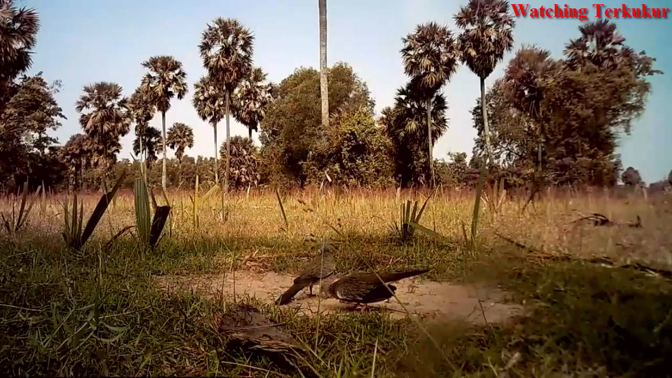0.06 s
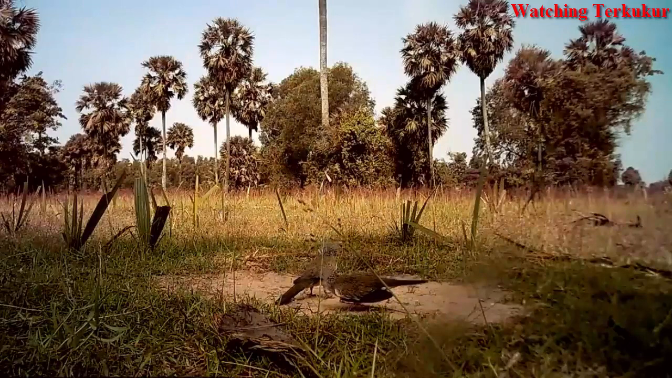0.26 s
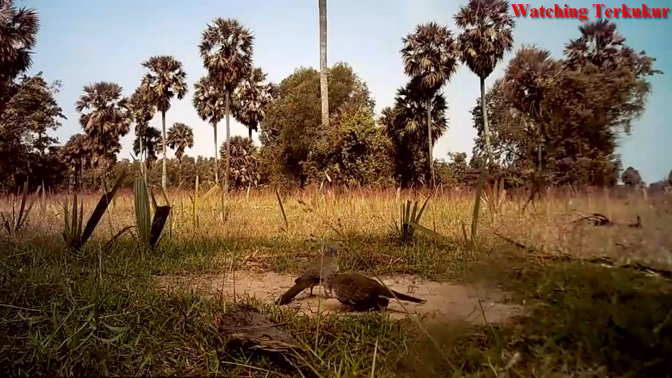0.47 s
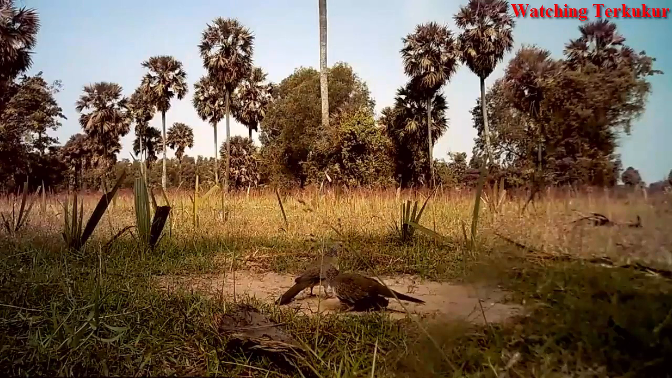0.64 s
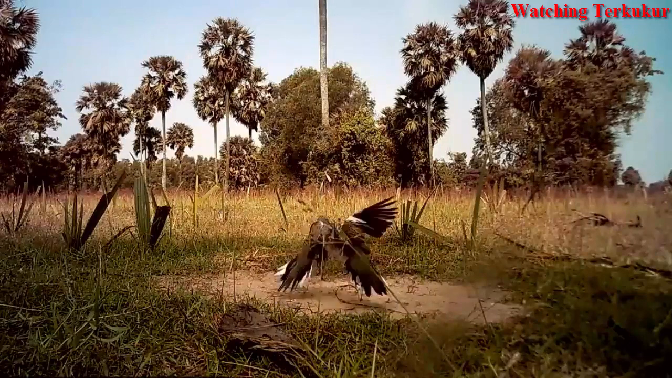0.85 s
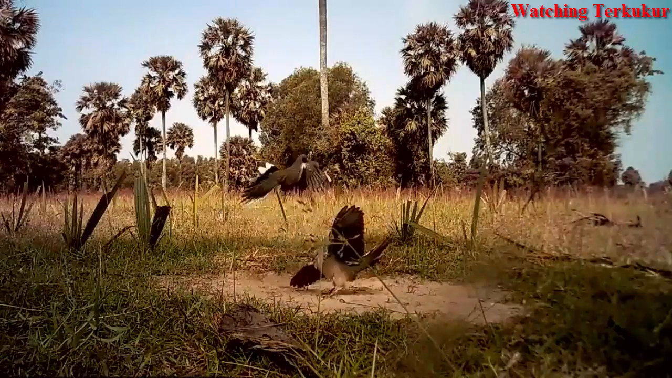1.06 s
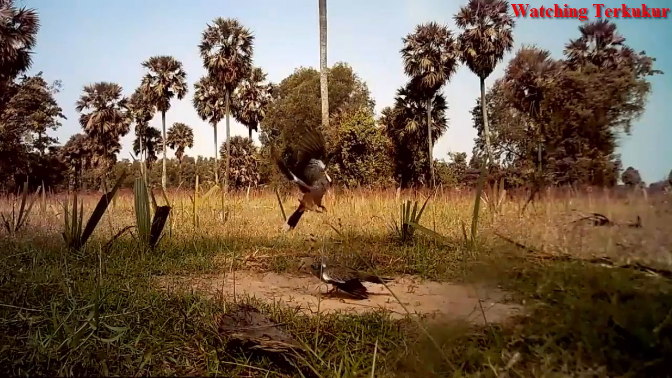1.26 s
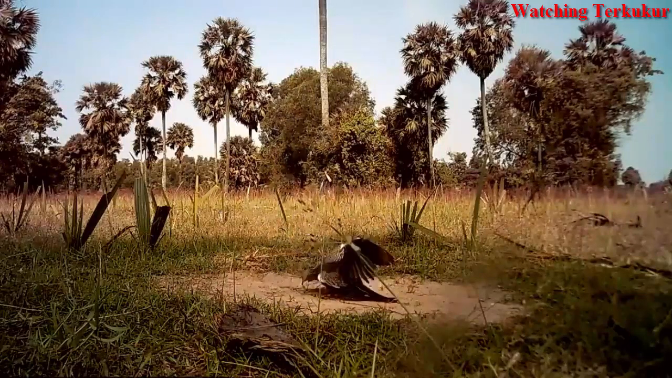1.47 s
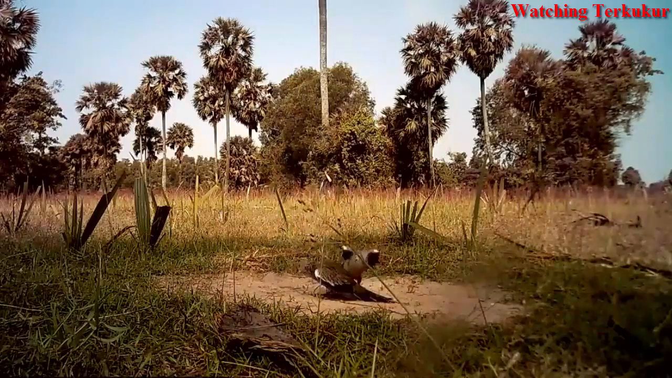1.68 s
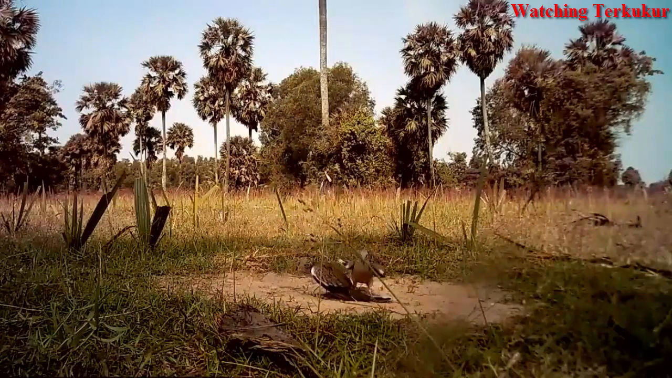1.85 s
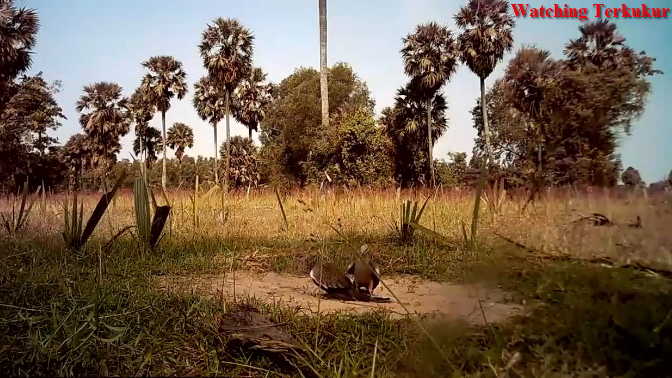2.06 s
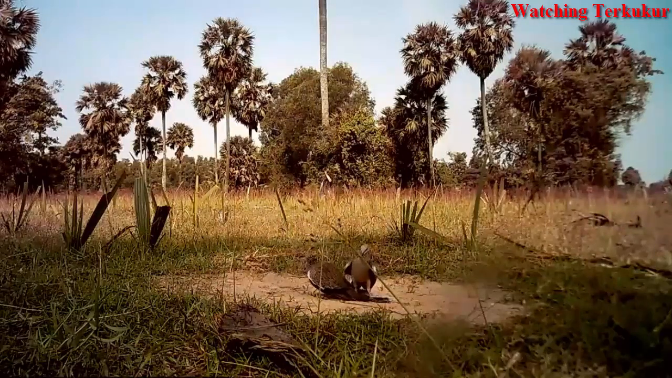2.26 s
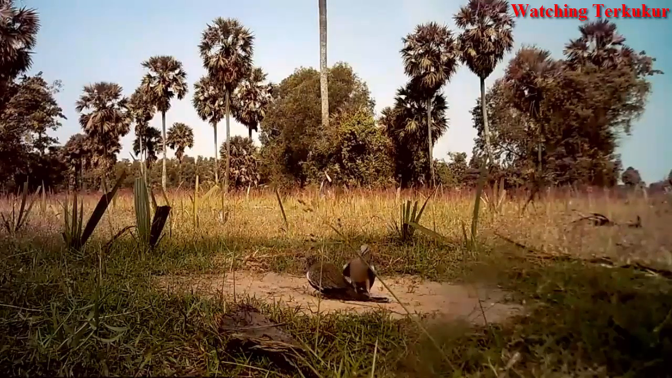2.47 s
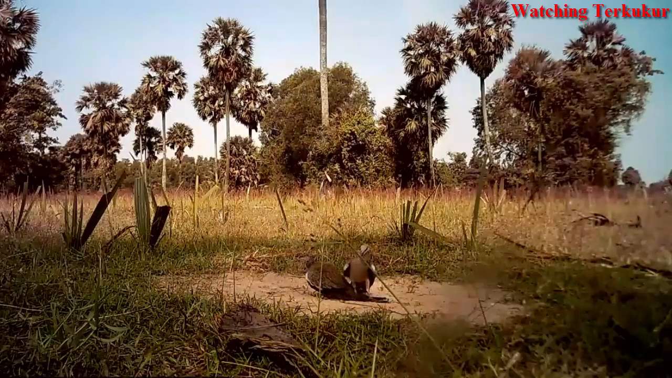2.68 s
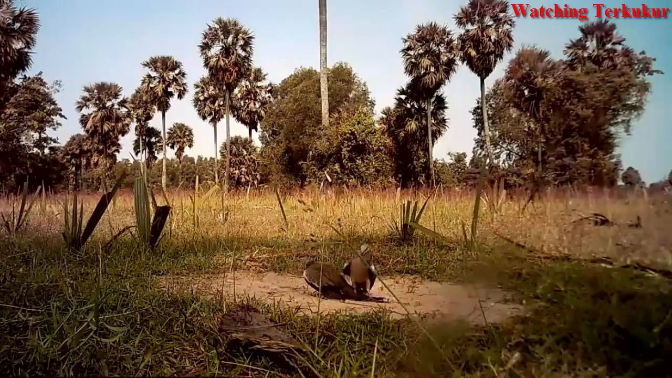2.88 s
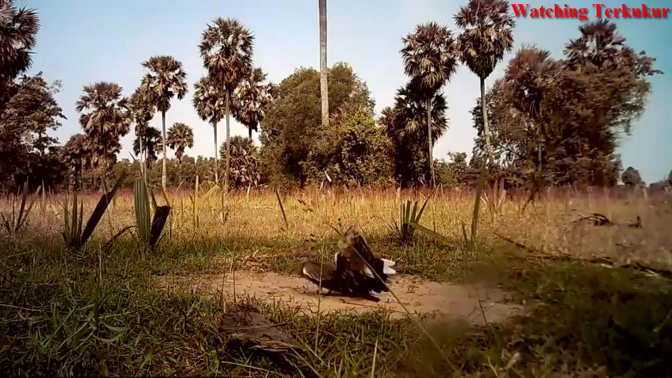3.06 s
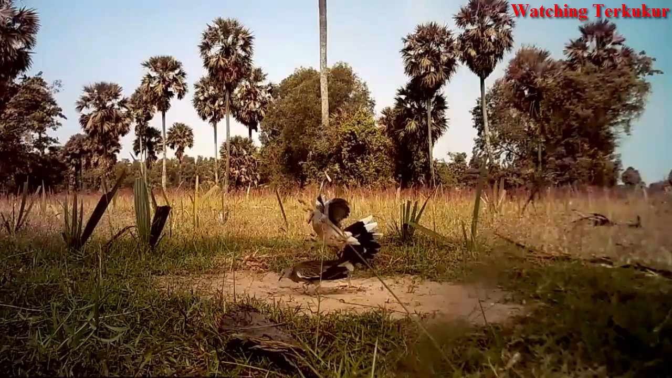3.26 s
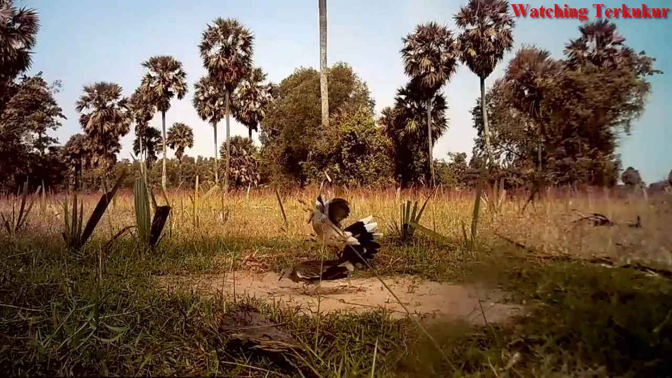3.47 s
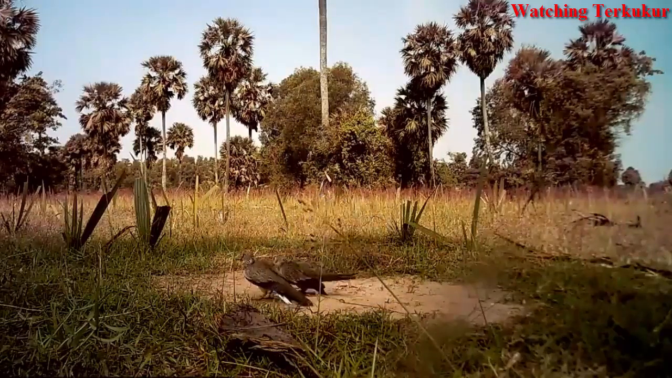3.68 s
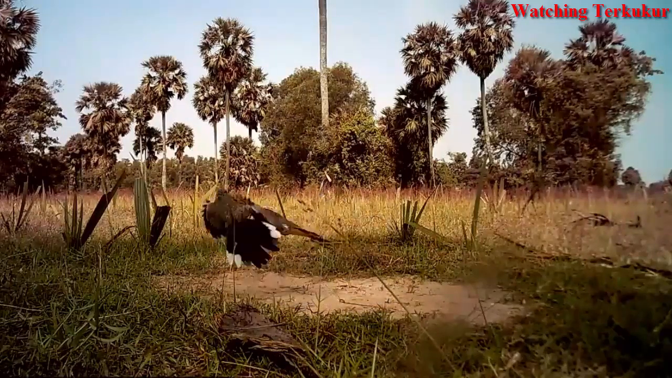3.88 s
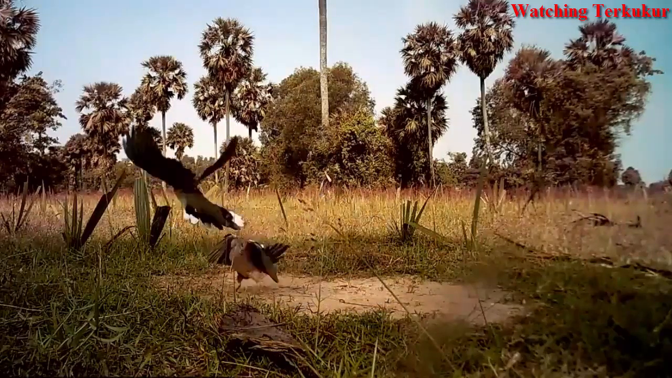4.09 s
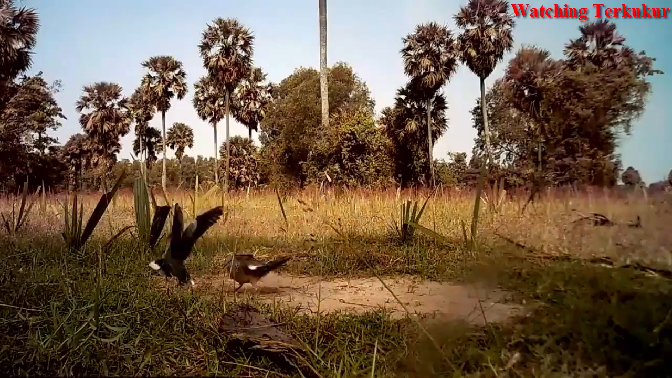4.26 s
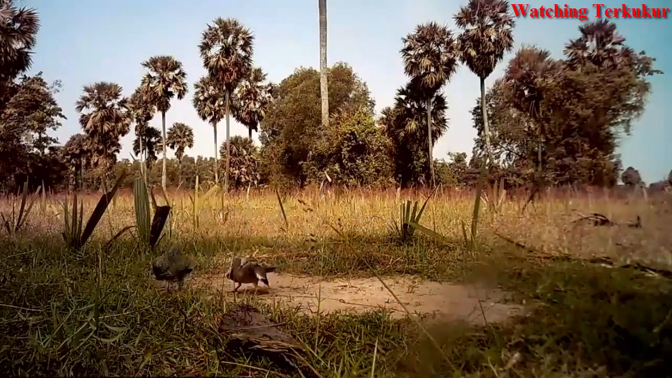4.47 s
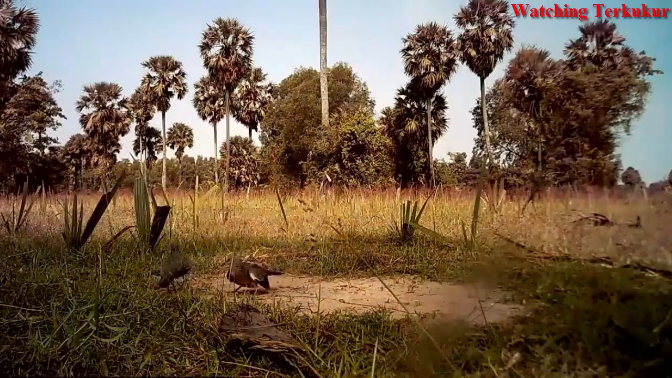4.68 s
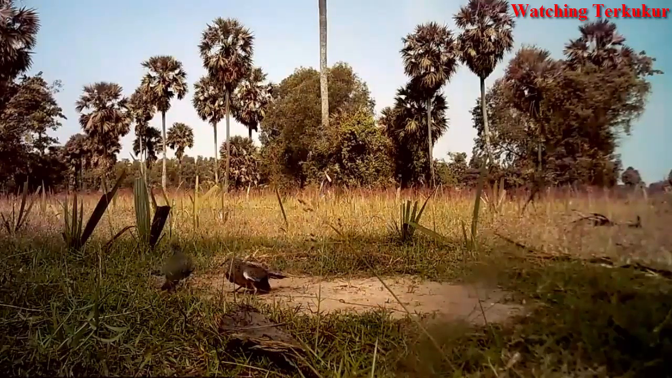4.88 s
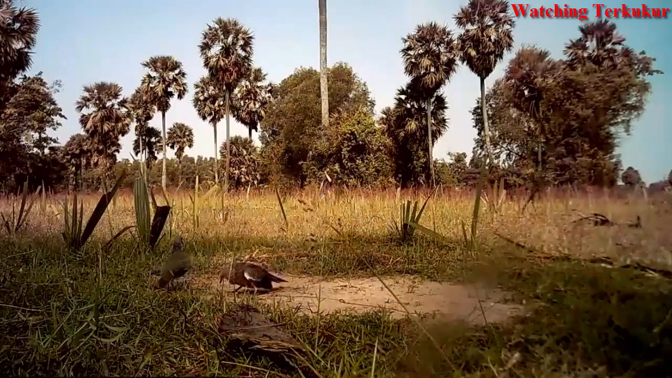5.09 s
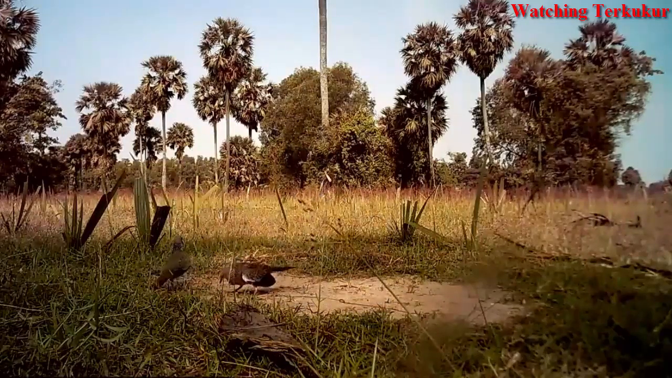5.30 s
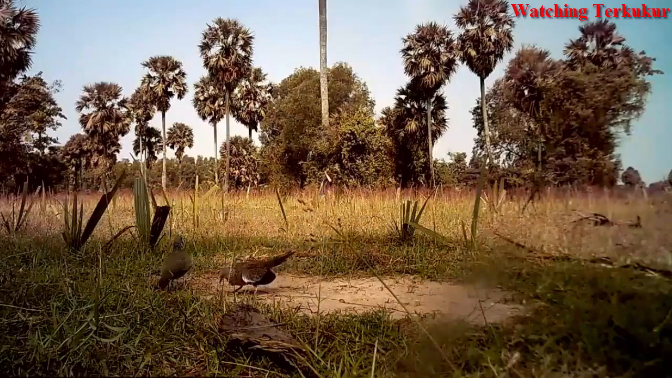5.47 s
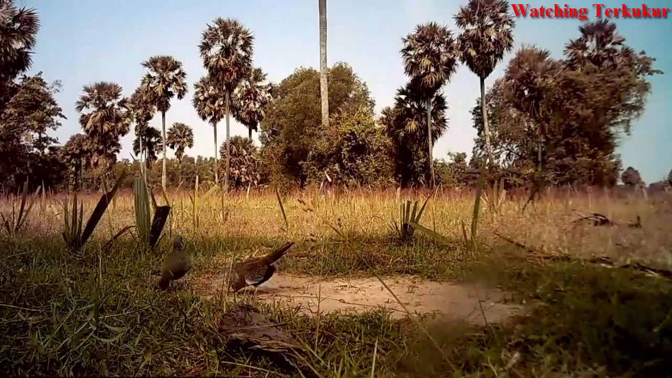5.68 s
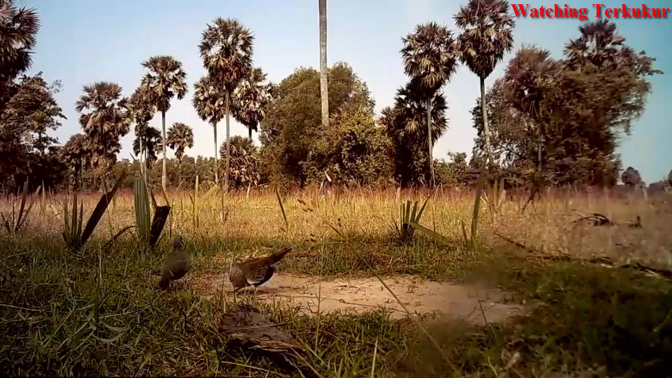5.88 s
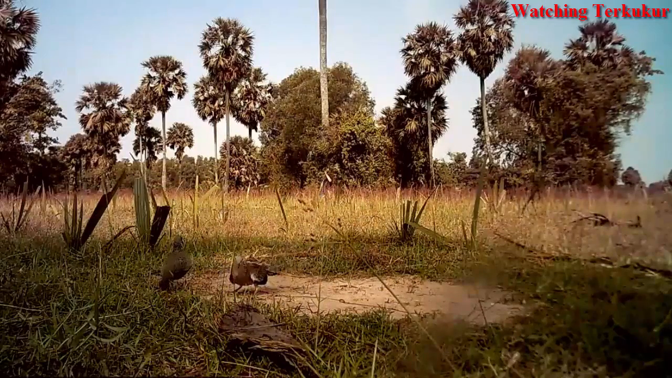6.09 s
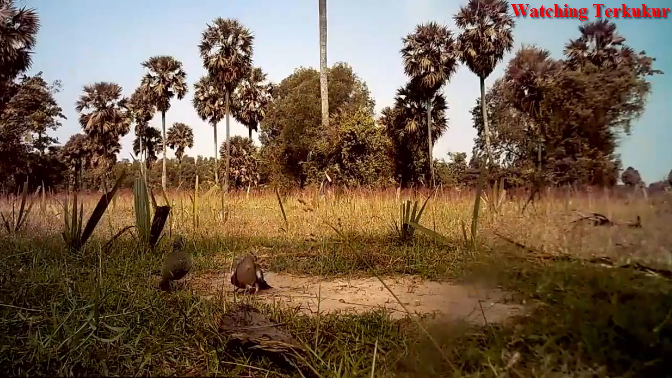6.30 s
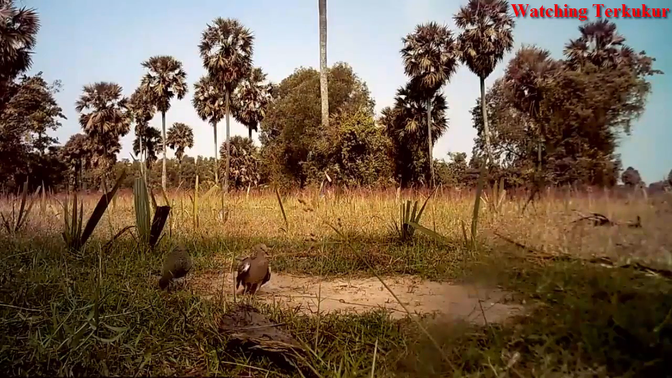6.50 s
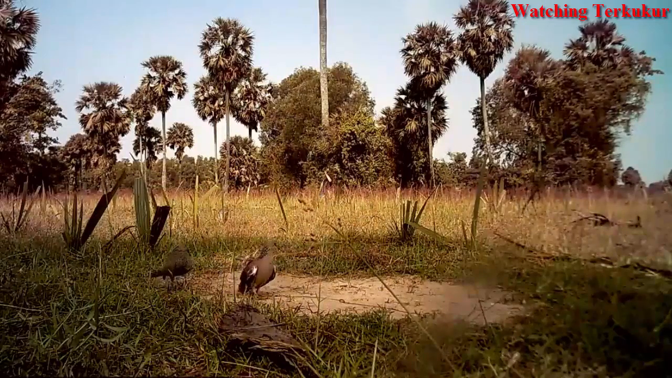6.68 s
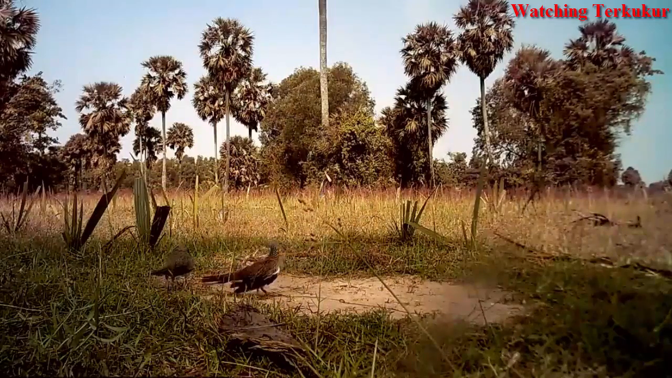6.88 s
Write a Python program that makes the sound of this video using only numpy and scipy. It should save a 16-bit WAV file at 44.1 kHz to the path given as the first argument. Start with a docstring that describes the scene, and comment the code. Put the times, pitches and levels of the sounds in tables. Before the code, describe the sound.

Two doves scuffle in an open field, wings clapping in sudden sharp bursts over low wind rumble, with faint whistled bird notes far off.

```python
"""Two doves scuffle on bare ground: wings clap in quick clusters and beat the air.
Each clap is a short, quickly fading pop of trapped air, unsteady in pitch, with feather crackle;
wing beats are fluttering bands of noise. Wind and far traffic rumble as low noise, with faint hiss above.
Soft whistled notes and a faint coo are gliding sines; far twitter is narrow noise bands.
A small camera's converter adds an offset and clips the loudest claps."""
import sys
import numpy as np
from scipy import signal
from scipy.fft import rfft, irfft
from scipy.io import wavfile
from scipy.ndimage import uniform_filter1d

SR = 44100
rng = np.random.default_rng(int(sys.argv[2]) if len(sys.argv) > 2 else 0)


def to_wav(s):
    """Save 16-bit WAV."""
    ch = np.atleast_2d(s).T  # columns
    pcm = np.round(np.clip(ch, -1, 1) * 32767)  # PCM
    wavfile.write(sys.argv[1], SR, pcm.astype(np.int16))


N = 306054


def undb(db):
    """Gain of a level in dB."""
    return 10 ** (np.asarray(db) / 20)


def curve(table, pad_s=0.023):
    """Join the points of a table with straight lines, one curve per column; silent outside its span."""
    s, *columns = np.transpose(table)
    s = np.r_[s[0] - pad_s, s, s[-1] + pad_s]
    return [np.interp(np.arange(N) / SR, s, np.r_[-120, column, -120]) for column in columns]


def colour(x, shape):
    """Make some pitches stronger than others, following (pitch [Hz], level [dB]) points."""
    hz, db = np.transpose(shape)
    f = np.arange(len(x) // 2 + 1) * SR / len(x) + 1
    gain = undb(np.interp(np.log(f), np.log(hz), db))
    return irfft(rfft(x) * gain, len(x))


def unit(x):
    """Scale to an average strength (rms) of 1."""
    return x / np.sqrt(np.mean(x ** 2))


def band(x, lo_hz, hi_hz, order=2):
    """Keep mainly the pitches between two edges."""
    return signal.sosfilt(signal.butter(order, [lo_hz, hi_hz], "band", fs=SR, output="sos"), x)


def walk(rate):
    """Wandering level: random steps, `rate` per second, smoothed twice."""
    k = int(SR / rate)
    steps = np.repeat(rng.standard_normal(N // k + 1), k)
    return 1.4 * uniform_filter1d(uniform_filter1d(steps, k), k)[:N]


def patch(hz, patchy_db, rate, width_hz=80):
    """A narrow noise band that comes and goes on its own."""
    noise = rng.standard_normal(N)
    return unit(band(noise, hz, hz + width_hz)) * undb(patchy_db * walk(rate))


# Tone of the open field: (pitch [Hz], level [dB])
FIELD_TONE = [(7.1, -29), (12, -20.5), (18, -10.5), (27, -10.5), (54, -8.5), (155, -15), (383, -27),
              (1170, -43), (1480, -63.5), (2550, -65.5), (2960, -69), (3660, -64.5), (5750, -75.5),
              (11800, -72.5), (16000, -95)]
# Loudness of the low rumble: (time [s], level [dB])
RUMBLE_CURVE = [(0, -36), (.37, -41), (.85, -46), (1.06, -40), (1.41, -40.5), (2.2, -40.5), (3.1, -40.5),
                (3.6, -39), (4.0, -37), (4.4, -39.5), (5.1, -39), (5.9, -41), (6.5, -45), (6.94, -47.5)]
# Fader on the steady noise, and on the offset in record(): (time [s], level [dB])
FADER_CURVE = [(0, 0), (.86, -6), (.885, 0), (5.95, -0.5), (6.94, -5.5)]


def field(gust_db=-0.79, flicker_db=2.0, drone_db=-13.0):
    """Wind and far traffic: low bands gust together and flicker alone, with steady noise above."""
    air = unit(colour(rng.standard_normal(N), FIELD_TONE))
    gust = walk(6.0)
    low = 0
    for hz in (7, 14, 28, 56, 112, 224):
        low = low + band(air, hz, 2 * hz, order=1) * undb(gust_db * gust + flicker_db * walk(20))
    # a hump in the low middle
    drone = unit(band(rng.standard_normal(N), 205, 290)) * undb(drone_db + 1.4 * walk(4.7))
    above = signal.sosfilt(signal.butter(2, 380, "high", fs=SR, output="sos"), air)
    steady = undb(-40.5) * above * undb(curve(FADER_CURVE)[0])
    return undb(curve(RUMBLE_CURVE)[0]) * (unit(low) + drone) + steady


def flaring_bands(x, edges_hz, patchy_db):
    """Split noise into neighbouring bands that each flare on their own."""
    total = 0
    for lo, hi in zip(edges_hz, edges_hz[1:]):
        total = total + band(x, lo, hi, order=3) * undb(patchy_db * walk(45))
    return unit(total)


# Tone of feathers, in beats and slaps alike: (pitch [Hz], level [dB])
FEATHER_TONE = [(35, -37.5), (60, -4.5), (316, -1.5), (803, -5), (938, -12), (1140, -9.5), (1860, -16.5),
                (2150, -24), (2400, -28.5), (2800, -27.5), (3300, -25.5), (3700, -32), (4140, -42.5),
                (7700, -47), (11000, -50.5), (15000, -52)]
# Effort of the wings, one list per flurry:
# (time [s], feather rustle [dB], its upper part [dB], hiss of the wing tips [dB])
WING_BEATS = [
    [(.878, -50, -50, -64), (.90, -31, -44, -50), (.945, -30, -42, -54), (.97, -32, -45, -54.5),
     (.99, -38, -44.5, -56), (1.012, -37.5, -46, -59.5), (1.025, -43, -51, -65), (1.042, -28, -43, -55),
     (1.072, -41, -51, -68), (1.095, -42, -47, -62), (1.115, -42.5, -65, -73), (1.132, -43, -63, -67),
     (1.15, -35, -48, -47.5), (1.164, -42, -53, -62), (1.175, -37, -53, -54), (1.19, -46, -74, -69),
     (1.25, -49, -72, -69), (1.30, -54.5, -81, -81), (1.35, -63, -78, -84), (1.41, -58.5, -72, -71),
     (1.46, -66, -80, -83), (1.55, -60, -74, -83), (1.58, -58.5, -63, -76), (1.605, -49.5, -54, -76),
     (1.635, -58, -66, -82), (1.75, -60, -73, -81)],
    [(3.168, -45, -62, -69), (3.19, -36.5, -51, -54), (3.22, -36.5, -42, -58), (3.236, -40, -51, -67),
     (3.262, -47, -53, -68), (3.28, -47, -63, -82), (3.305, -52, -69, -77), (3.35, -63, -73, -72),
     (3.39, -59, -80, -84), (3.43, -52, -58, -72), (3.47, -64, -73.5, -89), (3.6, -70, -78, -86.5)],
    [(3.797, -60, -70, -59.5), (3.815, -50.5, -58, -53), (3.83, -35.5, -40, -48), (3.88, -31.5, -37, -56),
     (3.905, -38, -47, -54), (3.925, -37.5, -47, -56), (3.945, -40.5, -51, -60), (3.98, -35, -45, -57.5),
     (4.015, -41.5, -51, -56.5), (4.035, -47, -68, -68), (4.06, -46, -71, -66), (4.105, -55, -75, -74),
     (4.16, -61.5, -76, -76.5), (4.3, -65, -72, -77)],
]
# whoosh level [dB] when the rustle is at -40 dB, and its rise per dB of rustle [dB]
WHOOSH_DB, WHOOSH_FOLLOWS = -34, 0.74


def beats(flutter_db=1.2, hiss_flutter_db=1.2, patchy_db=1.3):
    """Beating wings stir the air: whoosh, rustle and hiss share a flutter, and patches flare alone."""
    air = colour(rng.standard_normal(N), FEATHER_TONE)
    flutter = walk(90)
    grainy = air * undb(2.0 * walk(450))
    rough = grainy * undb(flutter_db * flutter)
    whoosh = unit(band(rough, 59, 200))
    rustle = flaring_bands(rough, (375, 600, 900, 1270), patchy_db)
    upper = flaring_bands(rough, (1270, 1551, 1800, 2120), patchy_db)
    hissing = grainy * undb(hiss_flutter_db * flutter)
    hiss = flaring_bands(hissing, (2450, 2940, 3230, 3700, 10900), patchy_db)
    # the strongest flurry counts at each moment
    db, upper_db, hiss_db = np.max([curve(flurry, pad_s=.012) for flurry in WING_BEATS], axis=0)
    whoosh_db = WHOOSH_DB + WHOOSH_FOLLOWS * (db + 40)
    return undb(whoosh_db) * whoosh + undb(db) * rustle + undb(upper_db) * upper + undb(hiss_db) * hiss


# Wing slaps and softer strokes: (time [s], peak of the pop [dB], pitch of the trapped air [Hz],
# brightness [dB per octave], drawn out [dB], ring of the feather shafts [dB])
WING_SLAPS = [(0.8857, -28, 530, 3.5, 1.5, 0), (0.8874, -10, 406, -1.5, -1, -25),
              (0.8917, -19, 753, 1, -6, -21), (0.907, -12, 880, 2.5, 2.5, -15),
              (0.9092, -12.5, 1720, 2.5, -5, -12), (0.911, -23, 1053, 4, 1, -9),
              (0.917, -22, 442, 1, -1.5, -17), (0.926, -18, 380, -0.5, -4, -25),
              (0.933, -7, 1410, 1.5, -3, -21), (0.935, -7.5, 463, 2, -3.5, -15),
              (0.9390, -13.5, 300, 0.5, 0.5, -29), (0.9503, -27, 586, 0.5, 6, -27),
              (0.98, -29.5, 336, 0.5, 1, -25), (1.033, -28.5, 1280, 1, 0, -27),
              (1.0395, -22, 492, -2, 0, -42), (1.0511, -25, 316, 0, -9, -35),
              (1.082, -45, 266, 2.5, 2, -23), (1.139, -28.5, 698, -1.5, 4, -8),
              (1.1483, -20.5, 694, -1.5, 3.5, -10), (1.172, -31, 503, 0.5, -4.5, -19),
              (1.198, -42, 790, -11, -1, -32), (1.2064, -22.5, 200, -10, 3, -42),
              (1.235, -28, 171, -10, 4, -40), (1.307, -47, 250, 1, 0, -14),
              (1.489, -35.5, 191, -9.5, 6, -43), (1.577, -46.5, 1600, -3, -4.5, -32),
              (1.597, -47, 900, 2.5, -3.5, -40), (1.61, -41, 860, 1, -7, -45),
              (3.169, -28, 196, -5.5, 1, -38), (3.177, -27, 282, -4.5, -3.5, -27.5),
              (3.1917, -19.5, 780, 4.5, 4, -2), (3.1937, -3, 330, 1, -4.5, -20),
              (3.1995, -9.5, 1020, 0.5, -1, -44), (3.203, -17, 702, -2, 7, -28),
              (3.211, -18.5, 606, 0.7, -1, -40), (3.249, -44.5, 1110, 3, 4, -28),
              (3.274, -42, 773, -6, 2.5, -35), (3.424, -46.5, 744, -2.5, 5, -38.5),
              (3.8195, -17.5, 320, -1, 1.5, -35), (3.8389, -2, 702, -0.5, -1.5, -17.5),
              (3.8404, 4, 358, 0.5, 1, -30), (3.8452, -8.5, 1070, 1, 0.5, -8),
              (3.8536, -8.5, 271, -1, 2.5, -33), (3.861, -2, 596, -1, -1, -18),
              (3.8638, 3, 333, -0.2, -0.5, -30), (3.8729, -14, 336, -0.5, -1, -33),
              (3.883, -38, 595, 3, 6, -27), (3.902, -41, 500, -0.5, -2, -11),
              (3.931, -33, 704, 2.5, -4, -25), (3.9585, -24, 1500, 2, -1, -22),
              (3.9622, -7, 400, -2, -3, -25), (3.9659, -17, 255, -1, 0, -25), (3.992, -26, 268, -7, 1, -14),
              (4.055, -37.5, 918, -11, 4, -40), (4.119, -41, 200, -10, -7, -39),
              (4.392, -45, 700, -3.5, -0.5, -40.5)]
# rise, ring (time to fall 60 dB) and crackle over the pop, for a slap at 0 dB that is not drawn out
RISE_MS, RING_MS, CRACKLE_DB = 0.26, 14, -5
# for each dB softer, strokes get slower and more feathery, up to a limit
SLOWER_DB_PER_DB, SLOWEST_DB = 0.22, 8
FEATHERY_DB_PER_DB, CRACKLE_MAX_DB = 0.15, 0
# feather shafts: middle pitch, random spread, and ring time as a share of the pop's
QUILL_HZ, QUILL_SPREAD, QUILL_RING_SHARE = 3120, 0.12, 0.29


def slaps(crackle_life=.8, wobble=.17, lead=512):
    """Air trapped between wings pops out as a few uneven cycles; the feathers crackle with it."""
    out = np.zeros(N + 8192)
    t = np.maximum(np.arange(8192) - lead, 0) / SR  # waits `lead` samples at zero
    for s, db, hz, bright_db, drawn_db, quill_db in WING_SLAPS:
        slower = undb(min(-SLOWER_DB_PER_DB * db, SLOWEST_DB) + drawn_db)
        crackle_db = min(CRACKLE_DB - FEATHERY_DB_PER_DB * db, CRACKLE_MAX_DB)
        rise = (1 - np.exp(-t * 1000 / (RISE_MS * slower))) ** 2
        fall_db = -60 * t * 1000 / (RING_MS * slower)
        noise = rng.standard_normal((3, len(t)))

        # the pop's pitch wobbles at random
        pitch_wobble = 1 + wobble * unit(band(noise[0], 60, 360, order=1))
        pop_phase = 2 * np.pi * hz * np.cumsum(pitch_wobble * (t > 0)) / SR
        pop = -np.sin(pop_phase) * rise * undb(fall_db)

        # feathers meet one after another
        feathers = noise[1] * undb(4.6 * unit(band(noise[2], 100, 900, order=1)))
        tone = [(f, d + bright_db * np.log2(min(f, 4500) / 1000)) for f, d in FEATHER_TONE]
        crackle = colour(feathers * rise * undb(fall_db / crackle_life), tone)
        crackle *= signal.windows.tukey(len(t), .1)
        crackle *= undb(crackle_db) * np.sqrt(np.sum(pop ** 2) / np.sum(crackle ** 2))

        # the stiff shafts ring briefly
        quill_hz = QUILL_HZ * (1 + QUILL_SPREAD * noise[0, 0])
        quill_phase = 2 * np.pi * quill_hz * np.cumsum(np.abs(pitch_wobble) ** .2 * (t > 0)) / SR
        ring = np.sin(quill_phase) * rise * undb(quill_db + fall_db / QUILL_RING_SHARE)

        i = int(s * SR) - lead
        out[i:i + len(t)] += undb(db) * (pop + crackle + ring) / np.abs(pop).max()
    return out[:N]


# Swells of faint patchy hiss, each starting around the time of a flurry, whose upper pitches drop out first: #
# (time [s], level at 1300 Hz [dB], hold before the edge falls below its top [s], fall of the edge [Hz per s])
HISS_SWELLS = [(1.0, -68.5, .8, 2480), (3.27, -77.5, .05, 3850), (3.9, -75, .05, 2200)]
HISS_TOP_HZ, HISS_EDGE_HZ_PER_DB, HISS_FLOOR_DB = 3900, 13, -100
HISS_RISE_S = 0.11  # time for the early 20 dB rise
HISS_TILT_DB_PER_OCT, HISS_FADE_DB_PER_S = -13, 9.5


def hiss_level(hz):
    """Level in dB of the hiss at one pitch: it swells, fades and drops once the edge has passed."""
    db = np.full(N, float(HISS_FLOOR_DB))
    for s, swell_db, held_s, fall_hz_per_s in HISS_SWELLS:
        t = np.arange(N) / SR - s
        past_edge_hz = np.maximum(hz - HISS_TOP_HZ + fall_hz_per_s * (t - held_s), 0)
        past_edge_db = past_edge_hz / HISS_EDGE_HZ_PER_DB
        early_db = 20 * np.maximum(1 - t / HISS_RISE_S, 0)
        pitch_db = swell_db + HISS_TILT_DB_PER_OCT * np.log2(hz / 1300)
        db = np.maximum(db, pitch_db - HISS_FADE_DB_PER_S * t - past_edge_db - early_db)
    return db


def faint_hiss():
    """Faint patchy hiss: many narrow noise bands, each following the level for its pitch."""
    return sum(undb(hiss_level(hz)) * patch(hz, patchy_db=3, rate=5) for hz in range(1300, 3700, 100))


# Soft whistled notes, low and high, some very faint, before the shared waver and swell:
# (time [s], length [s], starting pitch [Hz], glide over the note [Hz], level [dB])
NOTES = [(1.4, 0.042, 2800, 14, -58), (1.868, 0.11, 1730, 2, -66), (1.99, .2, 1719, -1.5, -67),
         (1.66, .1, 260, 0, -46), (1.83, .07, 300, 0, -47), (2.16, 0.047, 2775, 0, -75),
         (3.28, 0.59, 242.2, -4.5, -43), (3.157, 0.063, 3710, 18, -65), (3.268, 0.03, 1650, -2.5, -59),
         (3.325, .04, 3220, -3.5, -75), (3.30, .03, 2130, 1.5, -67), (3.393, .025, 1950, 1, -61.5),
         (3.33, .025, 1880, 4, -63), (3.636, 0.068, 3070, 15, -62.5), (3.724, 0.038, 3410, -37, -68.5),
         (3.752, .03, 3210, 20, -62), (4.06, 0.075, 2584, 7.5, -59), (4.79, 0.09, 3140, 29.5, -61.5),
         (4.89, 0.053, 3150, 17, -71), (5.061, 0.094, 3306, 20.5, -82.5), (5.099, 0.03, 2394, 4, -73),
         (5.085, .03, 3300, -200, -72), (5.16, .04, 3350, -250, -74), (4.7, .12, 2570, 0, -76),
         (5.22, 0.11, 3150, 0, -79.5), (5.377, 0.086, 2890, 21.5, -58.5), (5.385, .055, 4900, 2, -82.5),
         (5.47, 0.048, 2900, 2, -76.5), (5.53, .09, 2900, 1.5, -74), (5.62, .1, 2900, 0.5, -75),
         (5.74, .14, 2880, 0, -77), (5.46, .1, 2690, 0, -77), (5.64, .2, 2710, 0, -77)]


def whistled_notes(waver=0.0063, echo_db=-9.0, echo_t60=1.5):
    """Soft gliding sine notes, unsteady in pitch and level, trailing off among the trees."""
    out = np.zeros(N)
    unsteady = 1 + waver * walk(150)
    swell = undb(2.5 * walk(60))
    for s, length, hz, glide_hz, db in NOTES:
        i = int(s * SR)
        u = np.linspace(0, 1, int(length * SR))
        pitch = (hz + glide_hz * u) * unsteady[i:i + len(u)]
        tone = np.sin(2 * np.pi * np.cumsum(pitch) / SR)
        out[i:i + len(u)] += undb(db) * np.sin(np.pi * u) * tone
    out *= swell
    # the echo is a second of fading noise
    t = np.arange(SR) / SR
    trees = rng.standard_normal(SR) * undb(-60 * t / echo_t60)
    trees /= np.sqrt(np.sum(trees ** 2))
    return out + undb(echo_db) * signal.fftconvolve(out, trees)[:N]


# Overtones of a feather squeak: (multiple of the base pitch, level [dB])
SQUEAK_OVERTONES = [(3, -52), (4, -53), (5, -60), (6, -67)]
SQUEAK_S, SQUEAK_LENGTH_S, SQUEAK_HZ = 3.238, 0.029, 650  # start, length, base pitch before waver


def squeak(waver=0.0078):
    """A short rasp of overtones as feathers rub."""
    out = np.zeros(N)
    u = np.linspace(0, 1, int(SQUEAK_LENGTH_S * SR))
    i = int(SQUEAK_S * SR)
    phase = 2 * np.pi * np.cumsum(SQUEAK_HZ * (1 + waver * walk(600)[:len(u)])) / SR
    rasp = sum(undb(db) * np.sin(round(k) * phase) for k, db in SQUEAK_OVERTONES)
    out[i:i + len(u)] = np.sin(np.pi * u) * rasp
    return out


# Far twitter: (time [s], level [dB], middle pitch [Hz], half width [Hz])
TWITTER_CURVE = [(3.6, -80.5, 3110, 401), (3.76, -78, 3190, 402), (4.2, -78, 3000, 401),
                 (4.4, -74, 3030, 400), (4.68, -79.5, 3080, 451), (4.76, -74.5, 2860, 201),
                 (4.9, -77, 3000, 303), (5.02, -75, 3230, 248.4), (5.19, -79, 3250, 249),
                 (5.24, -83.5, 3200, 300), (5.36, -86, 3150, 302), (5.42, -90.5, 2900, 300),
                 (5.6, -83, 2900, 300), (5.75, -84.5, 2900, 298.5), (5.85, -81, 2950, 298.6),
                 (5.93, -78.5, 2900, 299)]


def twitter():
    """A blur of far small birds: narrow flickering bands around a middle pitch that wanders."""
    s, _, middle_hz, half_hz = np.transpose(TWITTER_CURVE)
    middle = np.interp(np.arange(N) / SR, s, middle_hz)
    half = np.interp(np.arange(N) / SR, s, half_hz)
    weights = {hz: np.exp(-((hz - middle) / half) ** 2 / 2) for hz in range(2350, 3800, 70)}
    blur = sum(w * patch(hz, patchy_db=3.5, rate=24, width_hz=60) for hz, w in weights.items())
    even = blur / np.sqrt(sum(w ** 2 for w in weights.values()))
    return undb(curve(TWITTER_CURVE)[0]) * even


def scene():
    """Open field, wings, faint hiss, whistled notes and twitter, in one channel."""
    return (field() + beats() + slaps() + faint_hiss() + whistled_notes() + squeak() + twitter())[None]


OFFSET = -.025  # constant shift of the wave when the fader is at 0 dB
TOP_HZ = 15700  # highest pitch let through


def record(dry):
    """The converter's offset follows the fader; the input clips near full scale and the top is cut."""
    offset = OFFSET * undb(np.maximum(curve(FADER_CURVE)[0], -9))
    clipped = np.clip(dry + offset, -.985, .985)
    return signal.sosfilt(signal.ellip(8, .05, 70, TOP_HZ, fs=SR, output="sos"), clipped)


dry = scene()
out = record(dry)
to_wav(out)
```